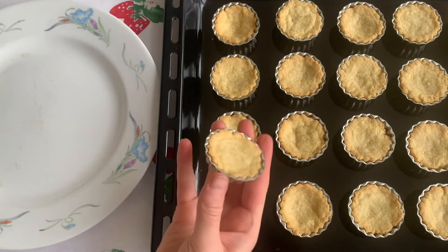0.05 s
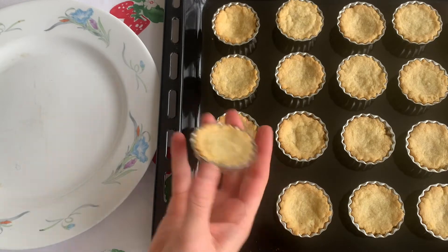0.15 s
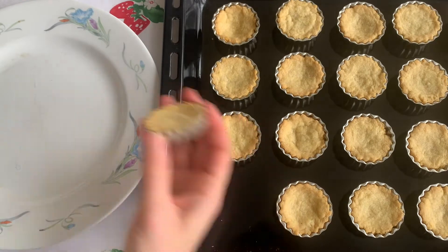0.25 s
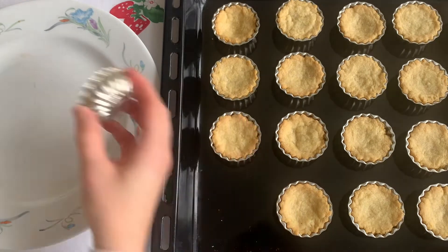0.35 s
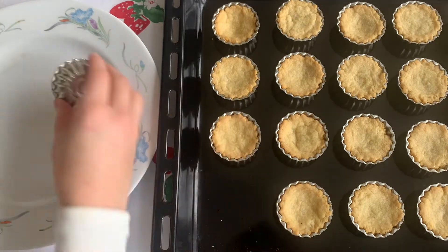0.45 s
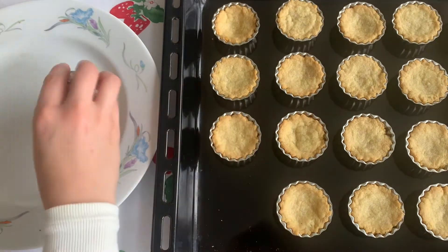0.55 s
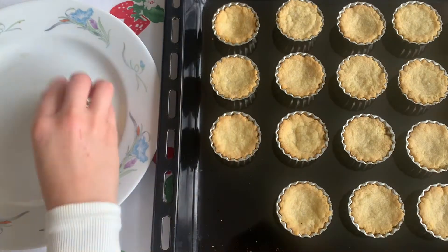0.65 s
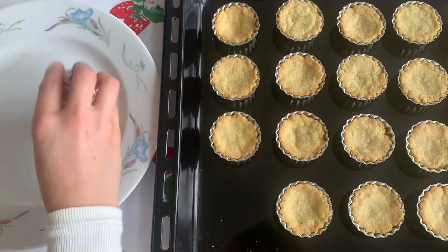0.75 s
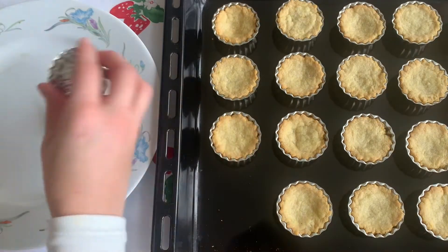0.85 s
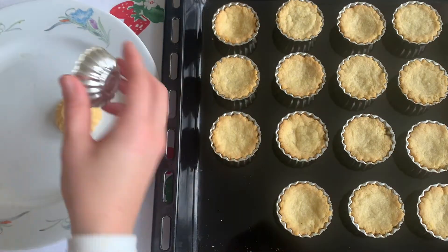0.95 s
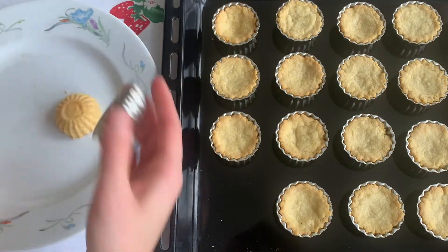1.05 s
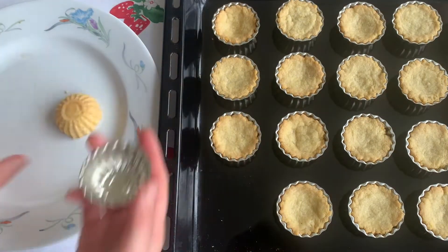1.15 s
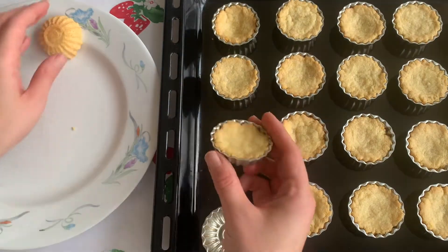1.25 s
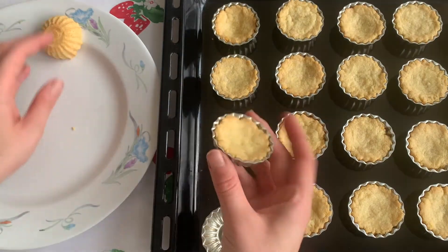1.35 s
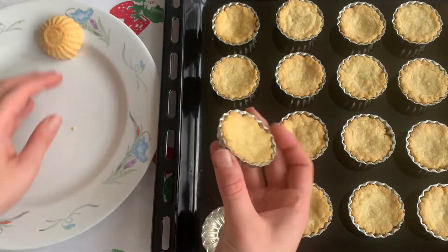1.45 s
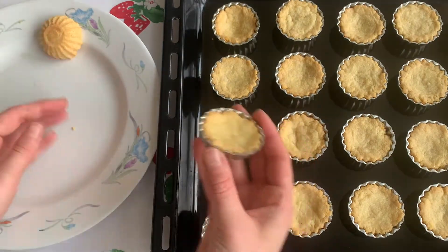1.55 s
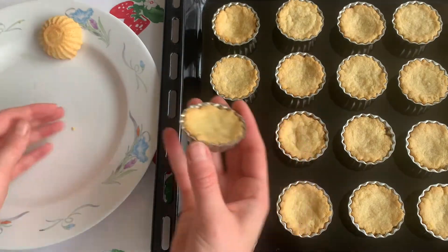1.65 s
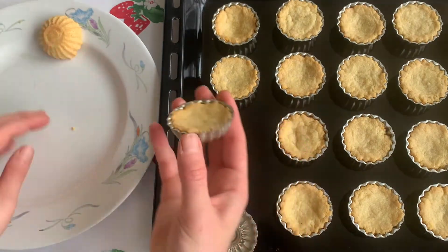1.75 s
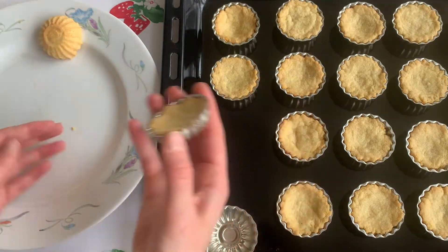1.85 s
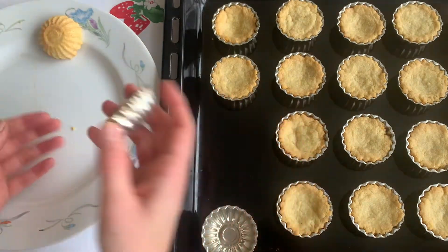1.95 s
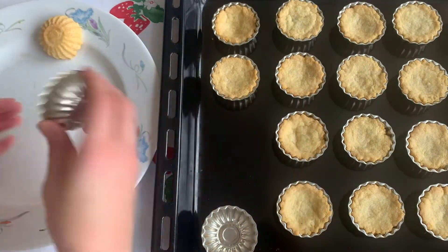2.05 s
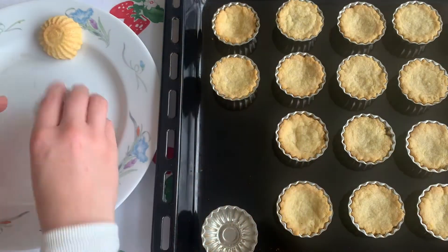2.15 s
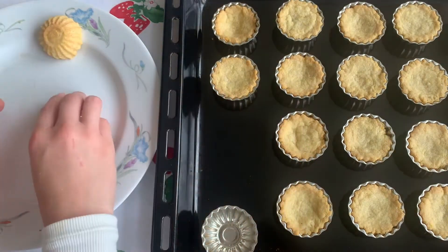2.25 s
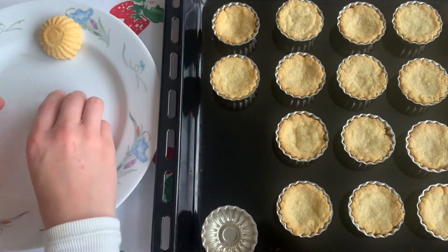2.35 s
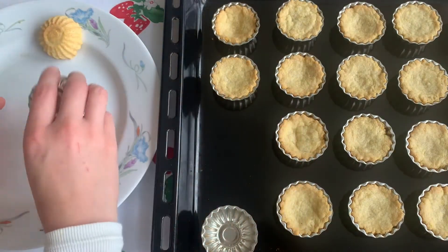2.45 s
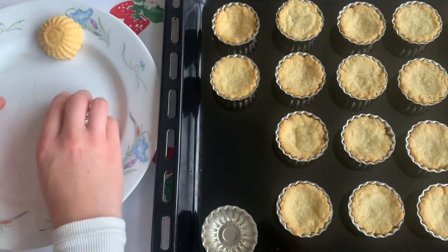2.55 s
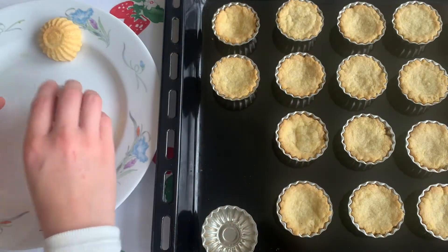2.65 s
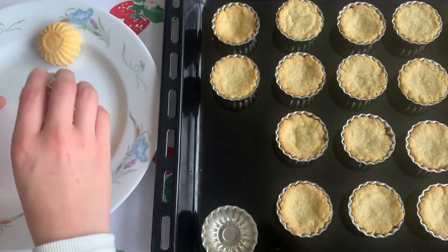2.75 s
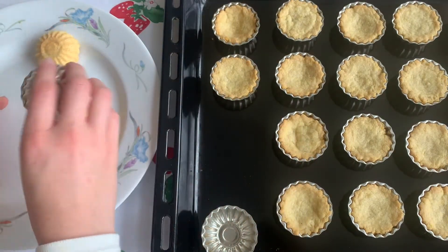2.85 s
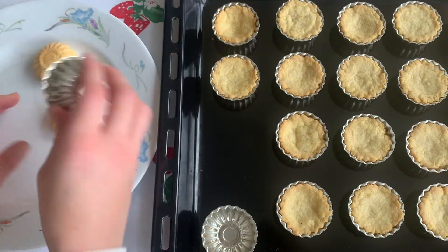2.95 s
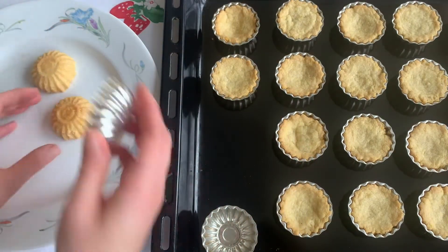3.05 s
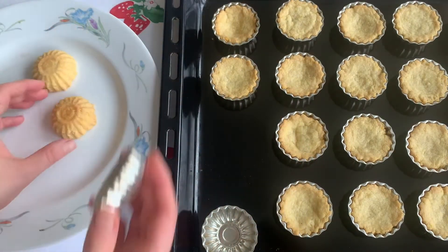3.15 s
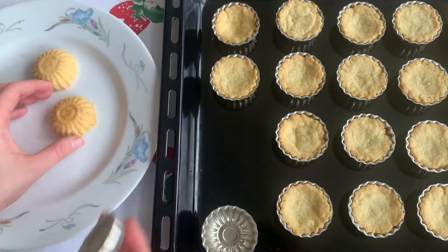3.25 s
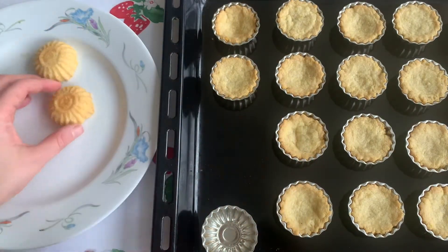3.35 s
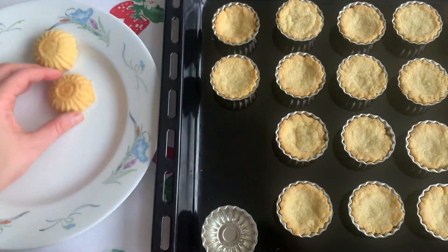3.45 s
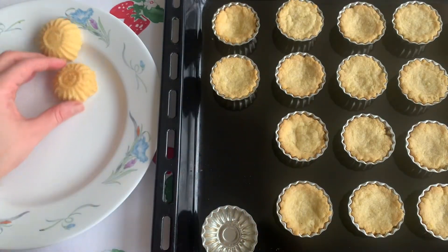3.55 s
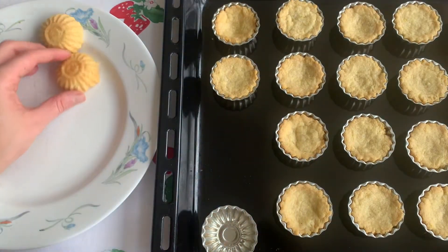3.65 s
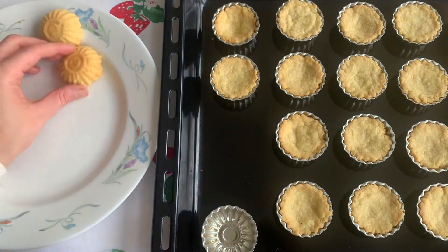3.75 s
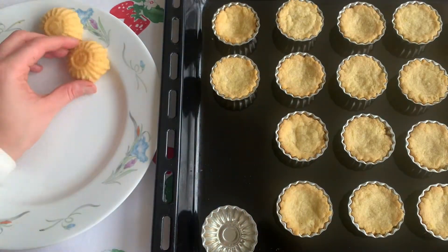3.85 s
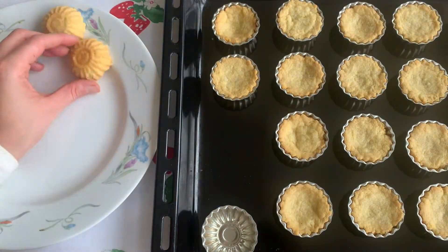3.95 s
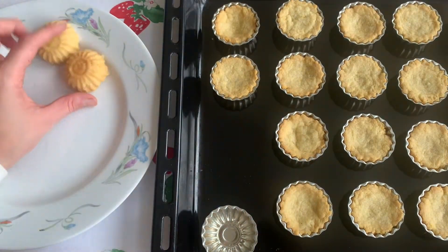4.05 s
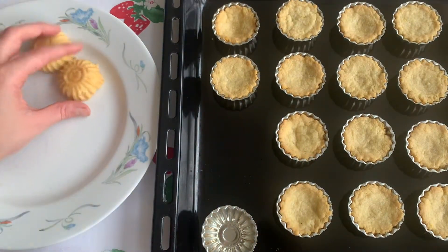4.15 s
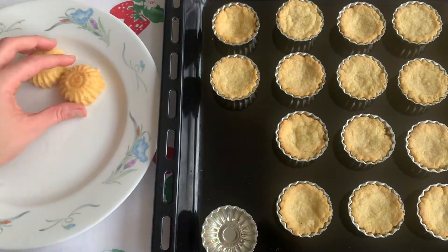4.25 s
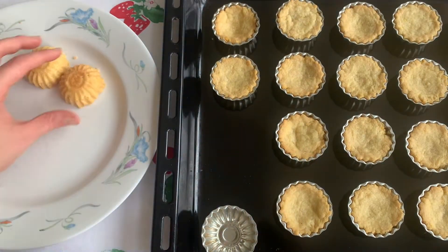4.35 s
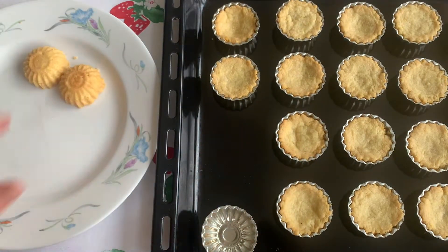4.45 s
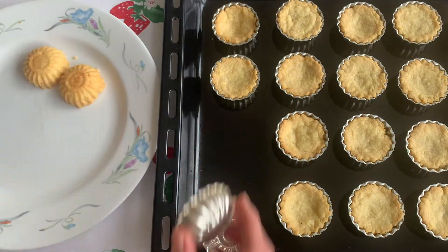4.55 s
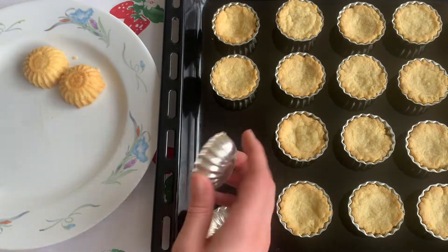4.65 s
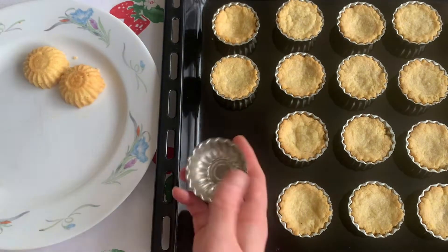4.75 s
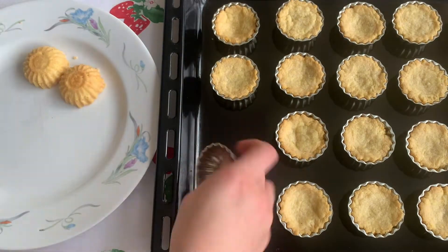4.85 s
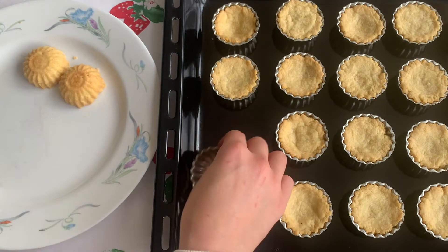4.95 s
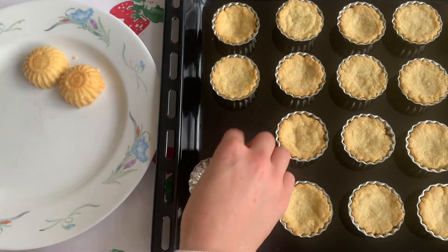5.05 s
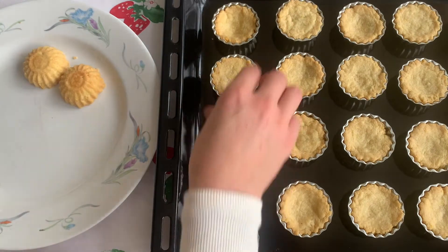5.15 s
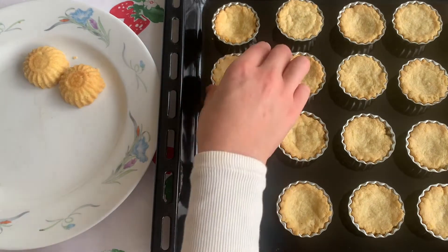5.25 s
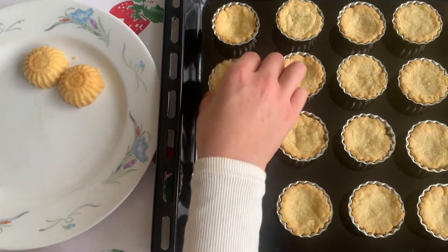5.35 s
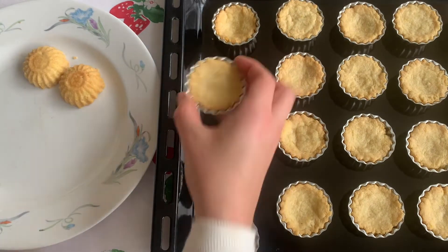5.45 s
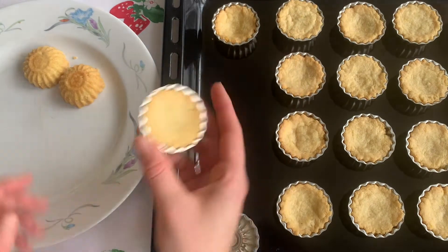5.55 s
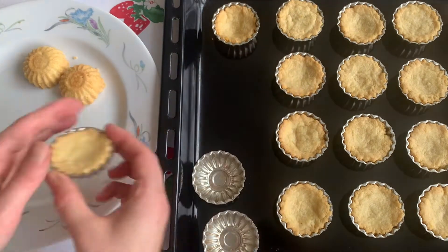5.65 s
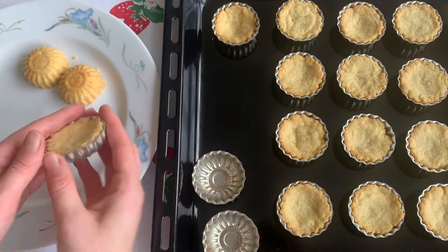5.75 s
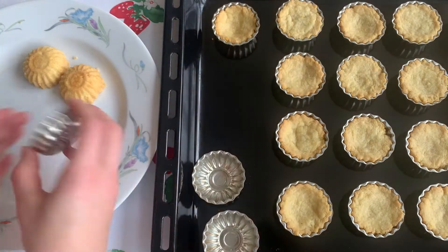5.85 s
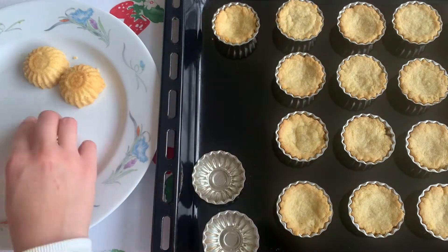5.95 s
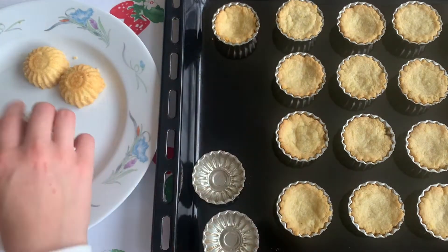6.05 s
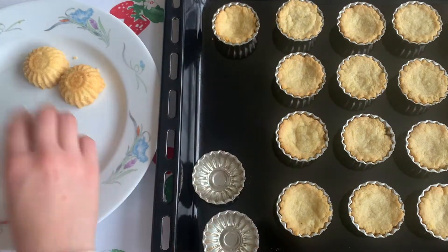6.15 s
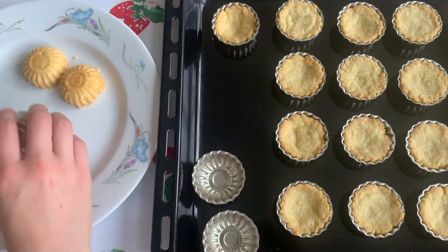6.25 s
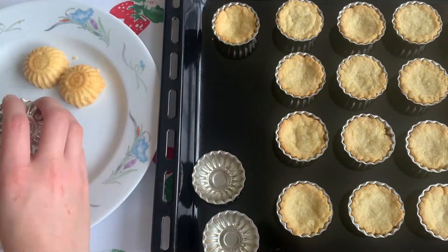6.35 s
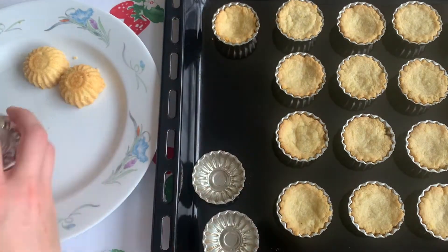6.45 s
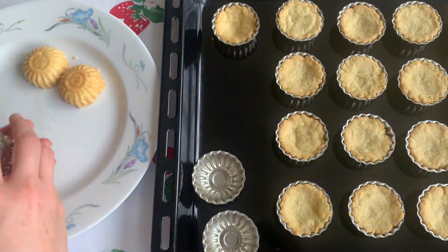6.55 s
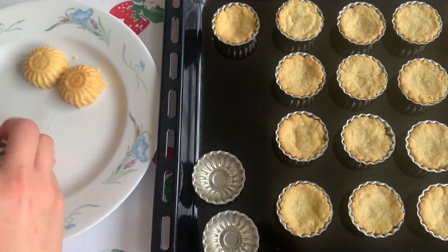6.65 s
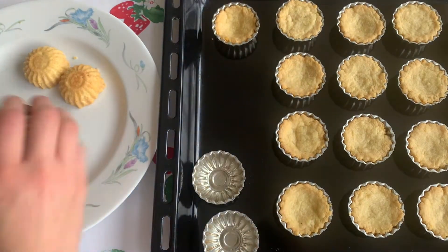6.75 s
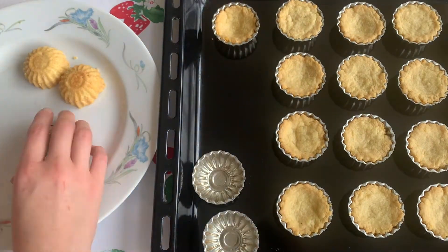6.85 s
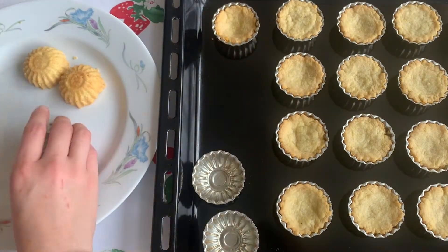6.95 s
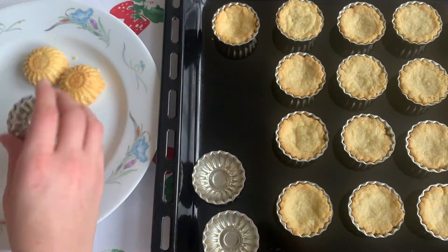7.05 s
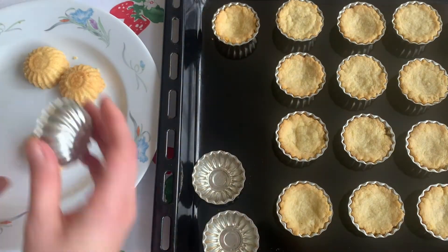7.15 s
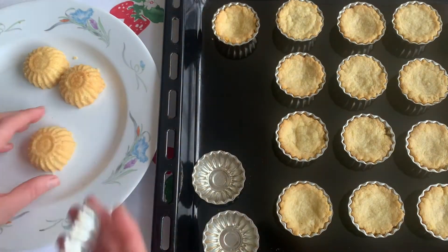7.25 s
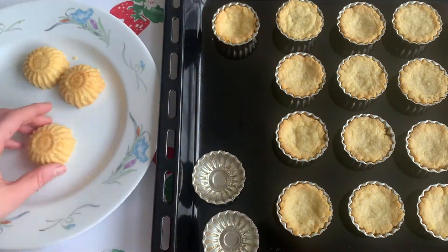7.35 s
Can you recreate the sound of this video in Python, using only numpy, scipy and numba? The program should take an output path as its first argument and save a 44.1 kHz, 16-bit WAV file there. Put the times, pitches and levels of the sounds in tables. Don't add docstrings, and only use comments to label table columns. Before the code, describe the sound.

Close up in a small kitchen, a metal baking tin is knocked upside down on a china plate in a quick double hit, then another tin twice more, with bright plate ring and a dull table thump. Soft pastry rubbing follows. The sound then turns faster and higher: an empty tin clatters onto a steel tray, a full one scrapes off, and three sharp knocks hit the plate. Stereo phone microphone, faint hiss and rustle.

```python
import sys
import numpy as np
from scipy import signal
from scipy.fft import rfft, irfft, next_fast_len
from scipy.io import wavfile
from scipy.ndimage import uniform_filter1d
from numba import njit

SR = 44100
rng = np.random.default_rng(int(sys.argv[2]) if len(sys.argv) > 2 else 0)


def output_pcm(signal):
    pcm = np.clip(np.atleast_2d(signal).T, -1, 1) * 32767
    wavfile.write(sys.argv[1], SR, np.round(pcm).astype(np.int16))


def voltage_ratio(level):
    return 10 ** (np.asarray(level, float) / 20)


N = 327222
PADDED = next_fast_len(N, True)
CUT_S, FAST = 3.872, 1.765

# start_s, crack_db, thump_db (table), room_db (send)
BLOWS = [
    (0.528, 7, -41.5, -20.5),
    (0.6007, -8.5, -51, -9.5),
    (2.157, 2.5, -48, -14),
    (2.512, 8, -33.5, -22),
    (5.925, 5.5, -37.5, -20.5),
    (6.174, 4, -38.5, -22),
    (6.794, 0.5, -41, -32.5),
]
# angle_deg (round the plate), ring_db, grip (share of the free ring time)
LANDINGS = [
    (79.1, 2.73, 0.68),
    (102.74, -4, 0.97),
    (167.2, -1.5, 0.88),
    (7.7, -4, 1.3),
    (150.8, 4, 0.63),
    (135.8, 1, 0.47),
    (169.8, 1.5, 0.55),
]
# t60_s, lobe_db (struck on a lobe), turn_deg (of the lobes)
PLATE = [(0.024, -11, 36), (0.13, -25, 95), (0.11, -36.5, 171.5), (0.17, -25.5, 27), (0.17, -31, 26.5),
         (0.14, -26.5, 13), (0.33, -23.5, 135.5), (0.37, -20, 136), (0.14, -14.5, 91), (0.29, -20, 69),
         (0.15, -12.5, 34), (0.19, -10, 68), (0.3, -7, 19.5), (0.16, -11.5, 61), (0.19, -8, 78.5),
         (0.2, -32.5, 36), (0.27, -13.5, 67.5), (0.14, -14.5, 41.5), (0.08, -30.5, 32), (0.07, -38, 48),
         (0.52, -22, 18), (0.22, -32.5, 31), (0.063, -24.5, 102), (0.098, -24, 56.5), (0.13, -32, 177.5),
         (0.13, -39, -2), (0.18, -38, 101)]
PLATE_HZ = np.array([2186, 2203, 2304, 3221, 3310, 3340, 4070, 4161, 4880, 4925, 5295, 5340, 6312, 7015, 7585, 9030, 9502, 9728, 10190, 10350, 10650, 10860, 11940, 12750, 13300, 15130, 15340.])
# pitch_hz, level_db, t60_s
TABLE = [(48, -5, 0.44), (60, -5.5, 0.67), (116.4, -3, 0.34), (162.66, -0.5, 0.43), (219, -2.5, 0.21),
         (269, 9, 0.11), (443, -10, 0.087), (610, -10.5, 0.041)]
# start_s, level_db, brightness_db (per octave), t60_s
CLATTER = [
    (4.959, -10, 6, 0.12),
    (4.97, -18.5, -0.5, 0.062),
    (4.982, -16, 3, 0.093),
    (5.014, -15.5, 2.5, 0.24),
    (5.031, -22.5, 12.5, 0.04),
    (5.053, -10.5, 2.5, 0.099),
    (5.095, -13.5, 8.5, 0.15),
    (5.108, -10, 2.5, 0.049),
    (5.126, -19.5, 0.8, 0.16),
    (5.15, -26, 0, 0.035),
]


def speed_at(s):
    return FAST if s > CUT_S else 1.


def blows():
    # pitch_hz, level_db (per Hz)
    crack_colour = [(100, -23), (450, -12), (1500, -10.5), (4000, -3), (7500, -1), (8400, -13), (9800, -10),
                    (16000, -25)]
    # pitch_hz, level_db (per Hz)
    tail_colour = [(100, -19), (450, -7), (1500, -2), (4000, -4), (5700, -20), (7000, -10.5), (8300, -28),
                   (12000, -39)]
    # pitch_hz, first_ring_db, free_ring_db
    slow_fingers = [
        [(2180, 3, -5), (2210, -4, -5), (2304, 8, 9), (3221, -4, 0), (3325, 4, 6), (4070, -10, 15),
         (4161, -6, -12), (4900, -1, 14), (5310, 5, -8), (6312, 4, -12), (7015, 0, -16), (7585, -5, -18),
         (9502, -4, 0), (10650, -5, -6), (11940, -1, 18), (12750, -2, 17), (13300, 3, 18), (15340, 3, 15)],
        [(2195, -12, -14), (2304, 4, 13), (3325, 19, 19), (4070, -5, 10), (4161, 6, -8), (5310, 0, -21),
         (6312, -10, -8), (7015, 6, 19), (7585, -5, -3), (9030, 3, 12), (9728, 22, 22), (10650, -16, -25),
         (11940, 2, 10), (12750, 10, 10), (13300, 5, 18), (15130, 12, 15)],
        [(2195, -16, 2), (2304, 3, 9), (3325, 11, 12), (4070, -5, -4), (4161, 1, -20), (4900, 4, 0),
         (5310, -1, 13), (6312, -7, -10), (7015, -2, 13), (7585, 1, 7), (9728, 3, -20), (10650, -14, 4),
         (11940, -10, 10), (15340, 2, 18)],
        [(2195, -9, 12), (2304, 7, 5), (3221, -17, -13), (3325, -6, -3), (4070, 5, 10), (4161, -1, -18),
         (4900, -1, -11), (6312, -3, -18), (7015, -4, -6), (9030, -14, 5), (9502, 17, 0), (9728, 0, -16),
         (10650, -20, 1), (11940, 10, 14), (12750, 0, -20), (13300, 3, 16), (15340, 8, 18)],
    ]
    # pitch_hz, first_ring_db, free_ring_db
    fast_fingers = [
        [(2195, 7, -5), (2304, -15, -2), (3221, 5, 4), (3325, 9, 24), (4070, -3, -3), (4161, -8, -16),
         (4900, -2, 8), (5310, -1, 1), (6312, 1, -5), (7015, 0, 0), (7585, 3, -3)],
        [(2195, 1, 8), (3221, -1, -9), (3325, 20, 19), (4161, 2, -4), (4900, 15, -4), (5310, -8, -9),
         (7015, 3, -4), (7585, 3, 0)],
        [(2195, -14, 1), (2304, 13, -3), (3221, -2, -4), (3325, 1, 4), (4070, -16, -20), (4161, -1, -4),
         (4900, 2, -13), (5310, -15, -4), (6312, -1, -6), (7585, 0, -10)],
    ]
    contact_s, choke_db, choke_s = 0.0013, -24, .004
    dry, send = np.zeros((2, 2, PADDED))
    next_starts = [blow[0] for blow in BLOWS[1:]] + [N / SR]
    for blow, landed, presses, later in zip(BLOWS, LANDINGS, slow_fingers + fast_fingers, next_starts):
        s, crack_db, thump_db, room_db = blow
        angle, ring_db, grip = landed
        speed = speed_at(s)
        mode_db = ring_db + landing(angle, speed)
        scuff = burst(crack_db - 32, 0.036 / speed, crack_colour[:5] + [(9500, -26)], speed)
        add(dry, s - 4096 / SR, scuff[:, ::-1])
        add(dry, s, thump(s, thump_db - 0.5))
        crack = burst(crack_db - 16.5, 0.039 / speed, crack_colour, speed)
        tail = burst(crack_db - 33, 0.11 / speed, tail_colour, speed, size=8192)
        first_db, free_db = fingers(presses, len(mode_db))
        china = plate(s, mode_db - 0.5, grip, contact_s / speed, first_db, free_db)
        for part in (crack, tail, china, chatter(s, mode_db)):
            overlap_s = np.arange(part.shape[1]) / SR + s - later
            part = part * voltage_ratio(choke_db * np.clip(overlap_s / choke_s, 0, 1))
            add(dry, s, part)
            add(send, s, voltage_ratio(room_db) * part)
    return dry, send


def landing(angle, speed):
    lobes = np.array([11, 12, 2, 6, 6, 6, 9, 5, 7, 5, 4, 2, 10, 9, 12, 3, 3, 11, 10, 2, 11, 10, 9, 5, 7, 8, 3])
    _, lobe_db, turn = np.transpose(PLATE)
    push = np.abs(np.cos(np.radians(lobes * angle + turn)))
    mode_db = lobe_db + 20 * np.log10(push + .01)
    return mode_db[PLATE_HZ * speed < 15500]


def fingers(presses, count):
    hz, first_db, free_db = np.transpose(presses)[:, :, None]
    near = np.exp(-((PLATE_HZ[:count] / hz - 1) / .009) ** 2)
    return np.sum(near * first_db, axis=0), np.sum(near * free_db, axis=0)


def plate(s, mode_db, grip, rise, first_db=0, free_db=0):
    count, speed = len(mode_db), speed_at(s)
    t60, lobe_db, _ = np.transpose(PLATE)[:, :count]
    hz = PLATE_HZ[:count]
    missed_db = lobe_db - mode_db
    twin_db = mode_db + free_db + .3 * (missed_db - missed_db.min()) - 17 - 2.5 * np.log2(hz / 4000)
    held_t60 = t60 / speed * grip * .75
    twin_t60 = np.clip(t60 / speed * 1.6, .24 / speed, .36 / speed)
    all_db = np.r_[mode_db + first_db + 2.5, twin_db]
    return ring(np.r_[hz, hz] * speed, np.r_[held_t60, twin_t60], all_db, rise=rise)


def chatter(s, mode_db):
    speed = speed_at(s)
    f = np.geomspace(300, 16000, 600)
    hz = PLATE_HZ[:len(mode_db), None]
    weight = voltage_ratio(.6 * mode_db[:, None] - 7 * np.log2(hz / 3000))
    power = np.sum(weight ** 2 / (1 + ((f / hz - 1) / 0.029) ** 2), axis=0)
    top_hz = min(9500, 13800 / speed)
    buzz_db = 10 * np.log10(power) - 45 * np.log2(np.maximum(f / top_hz, 1))
    points = np.transpose([f, buzz_db])
    return burst(.6 * mode_db.max() - 23.5, 0.34 / speed, points, speed, rise=0.0052, size=16384)


def thump(s, db):
    # pitch_hz, level_db (per Hz)
    thud_colour = [(40, -19.5), (150, 2.5), (300, 1), (700, -6), (1500, -13), (3000, -37)]
    speed = speed_at(s)
    hz, mode_db, t60 = np.transpose(TABLE)
    thud = burst(db + 0.5, 0.16 / speed, thud_colour, speed, rise=0.0006, size=8192)
    out = np.pad(thud, ((0, 0), (0, SR)))
    boom_db = db + mode_db + 1.2 * rng.standard_normal(len(hz))
    add(out, 0, ring(hz * speed, t60 / speed, boom_db, detune=.03, rise=.003))
    return out


def touches():
    # start_s, ring_db, thump_db, tick_db
    touch_events = [(2.653, -46, -55, -31), (2.693, -46, -50, -41), (3.491, -61.5, -74.5, -81),
                    (3.565, -58.5, -92, -79.5), (3.728, -58.5, -77, -77), (3.965, -69, -58.5, -57),
                    (4.193, -54.5, -68.5, -78), (4.258, -53.5, -90, -68.5), (4.831, -68, -78, -76.5),
                    (7.276, -56, -75, -73), (7.325, -48, -79.5, -67)]
    tick_colour = [(300, -4), (900, -24), (2000, 35), (5000, -26)]  # Hz, dB per Hz
    out = np.zeros((2, PADDED))
    pattern = landing(LANDINGS[3][0], 1) + 9.2
    for s, ring_db, thump_db, tick_db in touch_events:
        low_db = 14 * (s > 7) * (PLATE_HZ < 2250)
        mode_db = pattern + low_db + ring_db + 3 * rng.standard_normal(len(pattern))
        add(out, s, plate(s, mode_db, 0.79, 0.0069))
        add(out, s, thump(s, thump_db))
        add(out, s, burst(tick_db, 0.023, tick_colour, rise=0.0026))
    add(out, 3.965, ring(2580.0, 0.11, -53.0))
    return out


def free_rim():
    # pitch_hz, t60_s
    rim_modes = [(1452, .9), (695, .5)]
    # start_s, high_db, low_db
    lifts = [
        (.61, -46, -55),
        (2.2, -61, -60.5),
        (2.602, -51.5, -52.5),
        (4.12, -69, -83.5),
        (5.935, -41, -59.5),
        (6.811, -60, -73.5),
    ]
    out = np.zeros((2, PADDED))
    hz, t60 = np.transpose(rim_modes)
    for s, *db in lifts:
        add(out, s, ring(hz * speed_at(s), t60 / speed_at(s), np.array(db), rise=0.017))
    return out


def knocks():
    # start_s, level_db, pitch_hz, length_s
    knock_events = [(0.059, -48, 238, 0.038), (0.344, -68, 610, 0.13), (0.615, -29.5, 59, 0.06),
                    (1.245, -60.5, 151, 0.076), (1.401, -69, 78.6, 0.061), (1.901, -55, 87.2, 0.078),
                    (2.713, -50, 57.3, 0.081), (3.332, -55, 119, 0.05), (3.43, -47, 116, 0.098),
                    (3.587, -53.5, 223.4, 0.049), (3.704, -51, 117.3, 0.098), (3.905, -51, 258, 0.053),
                    (3.971, -43, 214, 0.054), (4.04, -45.5, 267, 0.083), (4.173, -46, 230, 0.051),
                    (4.257, -49, 191, 0.1), (6.248, -53.5, 91, 0.16), (6.618, -63, 297, 0.11),
                    (6.888, -58.5, 288, 0.13), (7.061, -60.5, 167, 0.073), (7.275, -51, 172, 0.04)]
    out = np.zeros((2, PADDED))
    t = np.arange(8192) / SR
    f = np.geomspace(20, 3000, 200)
    for s, db, hz, length in knock_events:
        speed = speed_at(s)
        modes = sum(1 / (1 + ((f / (m * speed) - 1) / 0.099) ** 2) for m, *_ in TABLE)
        body = np.transpose([f, 10 * np.log10(modes) - 9 * np.log2(f / hz) ** 2])
        push = np.clip(t / 0.013, 0, 1) * np.exp(-(t / (length / speed)) ** 2)
        rub = colour(rng.standard_normal((2, len(t))), body)
        add(out, s - .006, rub * push * voltage_ratio(db - 6.5))
    return out


def rocks():
    # start_s, low_db, middle_db, high_db, t60_s
    rock_events = [
        (3.905, -66, -64, -63, .12),
        (3.965, -58.5, -50.5, -58, .14),
        (4.034, -56, -50, -53.5, 0.25),
        (4.178, -48.5, -56, -51.5, 0.15),
        (4.257, -52, -74, -47.5, 0.11),
    ]
    out = np.zeros((2, PADDED))
    for s, *db, t60 in rock_events:
        add(out, s, ring(np.array([200., 285., 487.]), t60, np.array(db), detune=0.037, rise=0.0038))
    return out


def clatter():
    # pitch_hz, width_hz, level_db
    steel_modes = [(871, 10, -6.5), (2070, 180, -10), (2615, 29, 4), (3096, 26, 1), (3170, 11.4, -5.5),
                   (3485, 34, 0), (3550, 90, 7.5), (6210, 68, 5), (9870, 97, 6), (12800, 80, -5.5),
                   (13000, 97, -8), (13400, 16, -23), (13800, 70, -32), (14700, 100, 11.5),
                   (14600, 48, -22), (15400, 14, -18)]
    # pitch_hz, level_db (per Hz)
    steel_colour = [(40, -26), (90, -35), (200, -16), (450, 17), (1000, 15.5), (2000, 21.5), (3500, 12.5),
                    (5000, 8), (6500, 9), (8500, 4.5), (11500, 3.5), (14000, -19), (15800, -13)]
    # start_s, pitch_hz, level_db, t60_s
    tin_ring = [
        (5.155, 4910, -50, .45),
        (5.155, 4947, -56, .3),
    ]
    hz, width, peak_db = np.transpose(steel_modes)
    out = np.zeros((2, PADDED))
    for s, db, bright_db, t60 in CLATTER:
        tilted = [(30, -60), (150, -35)]
        tilted += [(f, d + bright_db * np.log2(f / 3000)) for f, d in steel_colour[3:]]
        add(out, s, burst(db - 8.5, 0.022, tilted))
        add(out, s, burst(db - 14.5, t60, tilted, rise=0.0064))
        mode_db = db - 19 + peak_db + (bright_db - 4) * np.log2(hz / 3000)
        mode_db = mode_db + 3 * rng.standard_normal(len(hz))
        add(out, s, ring(hz, np.minimum(1.5 / width, .045), mode_db, detune=0.023))
    add(out, 5.032, ring(np.array([12900., 13400.]), 0.17, -33, rise=.003))
    for s, f, db, t60 in tin_ring:
        add(out, s, ring(f, t60, db, rise=0.072))
    return out


def drag():
    # start_s, level_db
    scrape_level = [
        (5.23, -54.5),
        (5.238, -61),
        (5.278, -38),
        (5.3, -57),
        (5.337, -44),
        (5.38, -77.5),
    ]
    # pitch_hz, level_db (per Hz)
    scrape_colour = [(40, -18.5), (90, -14), (200, -26), (450, 4), (1000, -7.5), (2000, 1.5), (3500, -16),
                     (5000, -17), (6500, -24), (8500, -16), (11500, -31), (14000, -39), (15800, -39)]
    out = np.zeros((2, PADDED))
    s, db = np.transpose(scrape_level)
    lumps_db = 2.5 * np.repeat(rng.standard_normal(128), 64)
    grit = rng.standard_normal((2, 8192)) * voltage_ratio(lumps_db)
    level_db = np.interp(s[0] + np.arange(8192) / SR, s, db - 10.5, right=-120)
    add(out, s[0], colour(grit, [(100, -36)] + scrape_colour[2:]) * voltage_ratio(level_db))
    add(out, 5.268, ring(594, 0.11, -44, rise=0.0035))
    add(out, 5.261, burst(-47.5, 0.023, [(600, -19.5), (1900, 4), (4000, -33.5)]))
    return out


def tray():
    return signal.sosfilt(signal.butter(2, 280, "high", fs=SR, output="sos"), clatter() + drag())


def room(x, speed):
    # pitch_hz, t60_s
    wall_decay = [(100, 0.49), (1000, 0.15), (5000, 0.061), (16000, 0.27)]
    t = np.arange(16384) / SR
    hz, t60 = np.transpose(wall_decay)
    tail = 0
    for centre in 100 * 2. ** np.arange(8):
        octave = [(centre / 2, -40), (centre, 0), (centre * 2, -40)]
        band = colour(rng.standard_normal((2, len(t))), octave)
        decay = np.interp(np.log(centre / speed), np.log(hz), t60) / speed
        tail = tail + np.sqrt(centre) * band * voltage_ratio(-60 * t / decay)
    tail = tail * np.clip(t * speed / 0.002, 0, 1)
    soft = signal.butter(8, min(10500 * speed, 13800), fs=SR, output="sos")
    tail = signal.sosfilt(soft, tail)
    tail = tail / np.sqrt(np.sum(tail ** 2) / 2)
    return irfft(rfft(x[0]) * rfft(tail, PADDED), PADDED)


def air(points):
    # start_s, level_db
    still_level = [(0, -66), (.12, -67.5), (.4, -66), (.9, -70.5), (1.14, -75.5), (1.4, -74), (2.15, -71.5),
                   (3.08, -72), (3.62, -71.5), (4.19, -70), (4.67, -72.5), (4.9, -68.5), (5.33, -73.5),
                   (5.74, -71), (6.53, -71), (6.8, -70), (7.05, -73.5), (7.42, -71.5)]
    # start_s, level_db, length_s
    rustles = [
        (.42, -63, 0.37),
        (1.406, -66, 0.14),
        (3.51, -68, .1),
        (3.762, -70.5, 0.12),
        (4.189, -71.5, 0.042),
        (6.096, -74, 0.053),
        (6.276, -65, 0.047),
    ]
    murmur_db, murmur_rise_s, murmur_t60_s = -53.5, 0.074, 0.45
    t = np.arange(PADDED) / SR
    noise = colour(rng.standard_normal((2, PADDED)), points)
    rumble = signal.sosfilt(signal.butter(2, 300, fs=SR, output="sos"), noise)
    below = signal.sosfilt(signal.butter(2, 1300, fs=SR, output="sos"), noise)
    still = voltage_ratio(np.interp(t, *np.transpose(still_level))) ** 2
    sleeves = sum(voltage_ratio(db) ** 2 * np.exp(-((t - s) / length) ** 2) for s, db, length in rustles)
    murmur = 0
    for s, crack_db, *_ in BLOWS + CLATTER[:1]:
        late = np.maximum(t - s, 0) * speed_at(s)
        swell = np.minimum(late / murmur_rise_s, 1)
        murmur = murmur + (voltage_ratio(crack_db + murmur_db - 60 * late / murmur_t60_s) * swell) ** 2
    # band, then dB of still air, sleeves, murmur and lumpiness
    layers = [(noise - below, 9, -6, 9, .7), (below - rumble, 6, 9, 3, 1.5), (rumble, 6, 3, 9, 2.5)]
    out = 0
    for band, still_db, sleeve_db, far_db, lump_db in layers:
        steps = np.repeat(rng.standard_normal(PADDED // 3000 + 1), 3000)[:PADDED]
        lumps = uniform_filter1d(steps, 3000)
        power = still * voltage_ratio(2 * still_db) + sleeves * voltage_ratio(2 * sleeve_db) + murmur * voltage_ratio(2 * far_db)
        out = out + band * voltage_ratio(lump_db * lumps) * np.sqrt(power)
    return out * voltage_ratio(-16 * np.exp(-((t - 0.98) / 0.0078) ** 2))


def ports(hits, floor, speed):
    # pitch_hz, hits_lag_rad, air_lag_rad, hits_likeness (0-1), air_likeness (0-1), gain_db
    port_pair = [(0, 0, 0, .93, .6, 1.5), (600, .1, .5, .88, .3, 2.5), (2200, .5, 1.8, .9, .35, 4),
                 (3800, 1.5, 2.4, .85, .5, 0), (4600, 2.5, 2.8, .9, .9, 0), (5800, 4, 3.5, .9, .95, 0),
                 (8300, 6.2, 6.1, .97, .98, 0), (11000, 8.2, 8.9, .95, .99, 0),
                 (14000, 11, 10, .93, .99, 0), (15500, 12.5, 12.5, .95, .97, 0)]
    hz, *columns = np.transpose(port_pair)
    f = np.fft.rfftfreq(PADDED, 1 / SR)
    lag_hits, lag_air, like_hits, like_air, gain_db = (np.interp(f, hz * speed, c) for c in columns)
    right = 0
    for x, lag, like, db in ((hits, lag_hits, like_hits, gain_db), (floor, lag_air, like_air, 0)):
        shared, unshared = rfft(x)
        mixed = like * shared + np.sqrt(1 - like ** 2) * unshared
        right = right + voltage_ratio(db) * np.exp(-1j * lag) * mixed
    return np.array([hits[0] + floor[0], irfft(right, PADDED)])[:, :N]


def add(out, s, x):
    start = int(s * SR)
    out[:, start:start + x.shape[1]] += x[:, :out.shape[1] - start]


@njit
def sines(size, hz, t60, gain, phase, rise):
    out, fade = np.zeros(size), np.exp(-1 / (rise * SR))
    for m in range(len(hz)):
        turn = np.exp(2j * np.pi * hz[m] / SR - np.log(1000) / (t60[m] * SR))
        z, gap = gain[m] * np.exp(1j * phase[m]), 1.
        for i in range(min(size, int(1.2 * t60[m] * SR))):
            out[i] += z.imag * (1 - gap)
            z *= turn
            gap = gap * fade + 1e-30
    return out


def ring(hz, t60, db, detune=0.00053, rise=0.0009):
    hz, t60, db = np.broadcast_arrays(np.atleast_1d(hz), t60, db)
    chance = rng.standard_normal((2, len(hz)))
    gain = voltage_ratio(db) * (hz < .45 * SR)
    size = int(1.1 * t60.max() * SR)
    pitch = hz * (1 + detune * chance[0])
    return np.array([sines(size, pitch, 1. * t60, gain, 2.7 * k * chance[1], rise) for k in range(2)])


def colour(x, points, speed=0.99):
    f, db = np.transpose(points)
    bins = np.fft.rfftfreq(x.shape[-1], 1 / SR)
    gain = voltage_ratio(np.interp(np.log(bins + 1), np.log(f * speed), db))
    return irfft(rfft(x) * gain / np.sqrt(np.mean(gain ** 2)), x.shape[-1])


def burst(db, t60, points, speed=1., rise=0.0001, size=4096):
    t = np.arange(size) / SR
    x = colour(rng.standard_normal((2, size)), points, speed)
    return x * (1 - np.exp(-t / rise)) * voltage_ratio(db - 60 * t / t60)


def scene():
    # pitch_hz, level_db (per Hz)
    slow_air = [(40, -11), (90, 4), (200, -7), (450, -9.5), (1000, -11.5), (2000, -10.5), (3500, -13.5),
                (5000, -12.5), (6500, -12), (8500, -23.5), (11500, -19), (14000, -29.5), (15800, -33.5)]
    # pitch_hz, level_db (per Hz)
    fast_air = [(40, -25.5), (90, -2), (200, 1), (450, -3.5), (1000, -8.5), (2000, -12), (3500, -10),
                (5000, -10.5), (6500, -13), (8500, -12.5), (11500, -10.5), (14000, -22.5), (15800, -21)]
    dry, send = blows()
    tins = tray()
    dry = signal.sosfilt(signal.butter(2, 42, "high", fs=SR, output="sos"), dry)
    dry = dry + touches() + free_rim() + knocks() + tins
    send = send + voltage_ratio(-13.0) * tins
    after = np.clip((np.arange(N) / SR - CUT_S) / 0.025 + .5, 0, 1)
    slow = ports(dry + room(send, 0.88), air(slow_air), 1.)
    fast = ports(dry + room(send, FAST) + rocks(), air(fast_air), FAST)
    return slow * np.sqrt(1 - after) + fast * np.sqrt(after)


def low_pass(x):
    return signal.sosfilt(signal.butter(12, 16960, fs=SR, output="sos"), x)


def record(dry):
    held = np.clip(dry, -.86, .86)
    mix = signal.sosfilt(signal.ellip(8, .2, 50, 15950, fs=SR, output="sos"), held)
    return low_pass(mix)


dry = scene()
out = record(dry)
output_pcm(out)
```